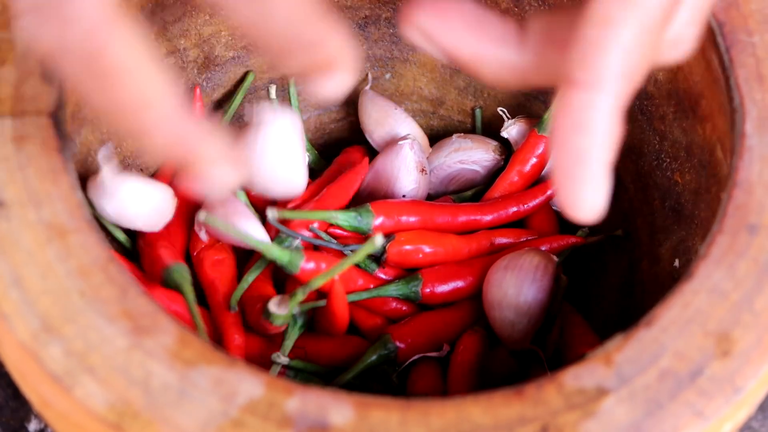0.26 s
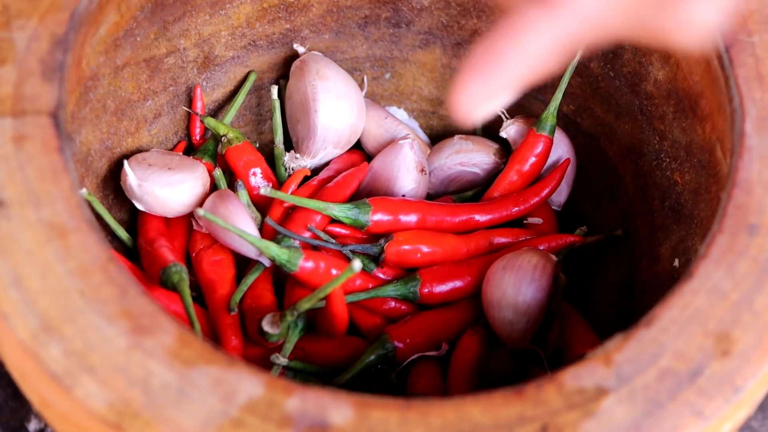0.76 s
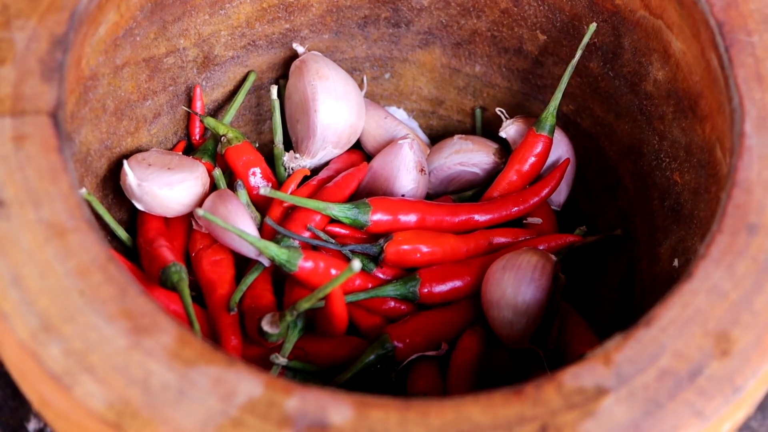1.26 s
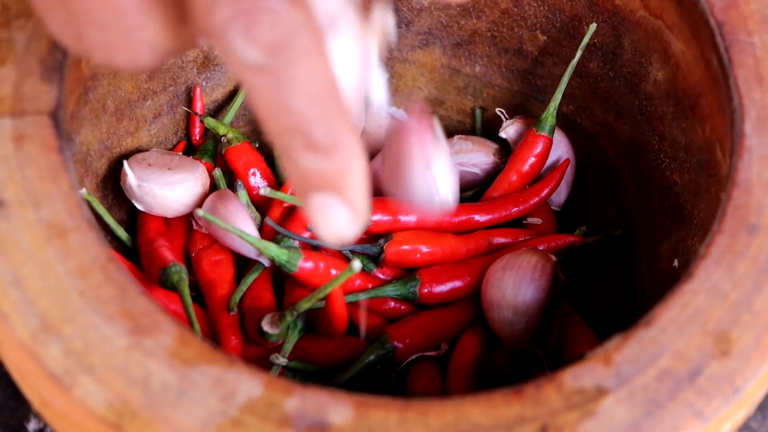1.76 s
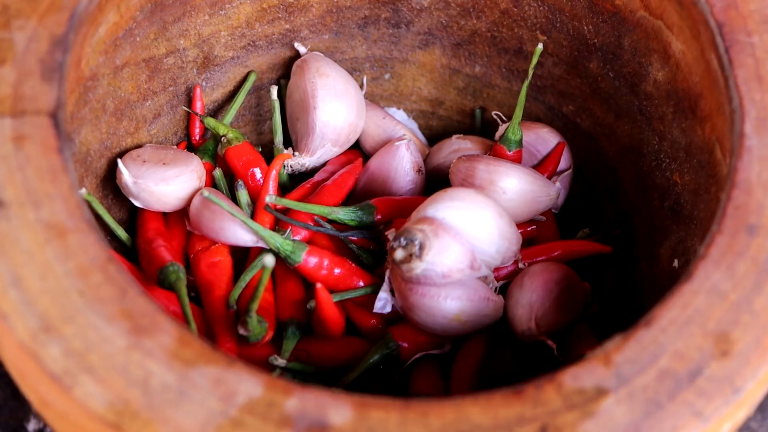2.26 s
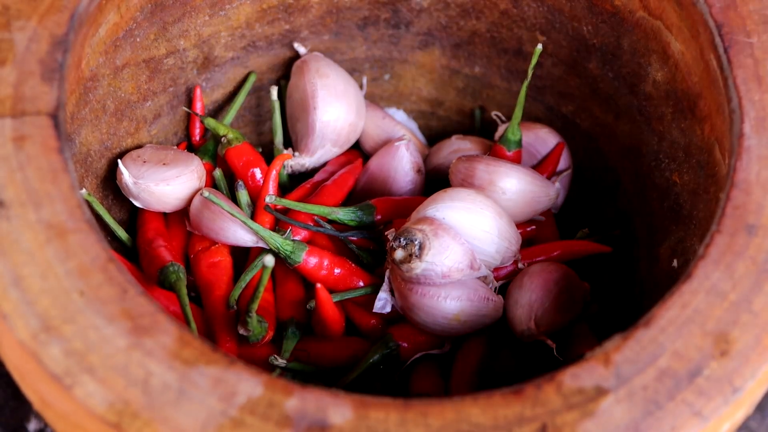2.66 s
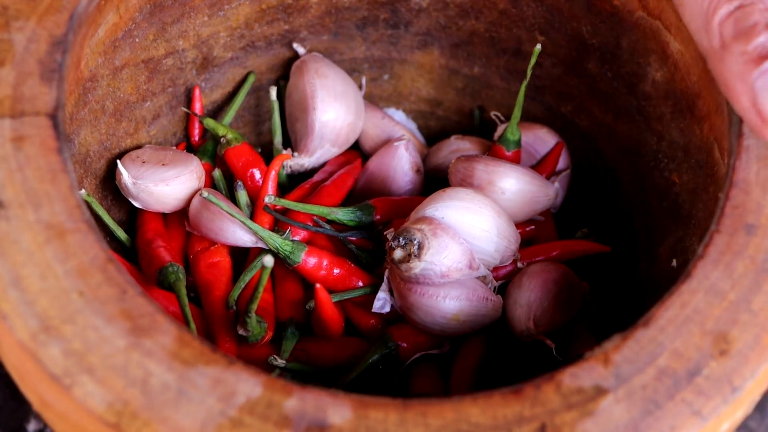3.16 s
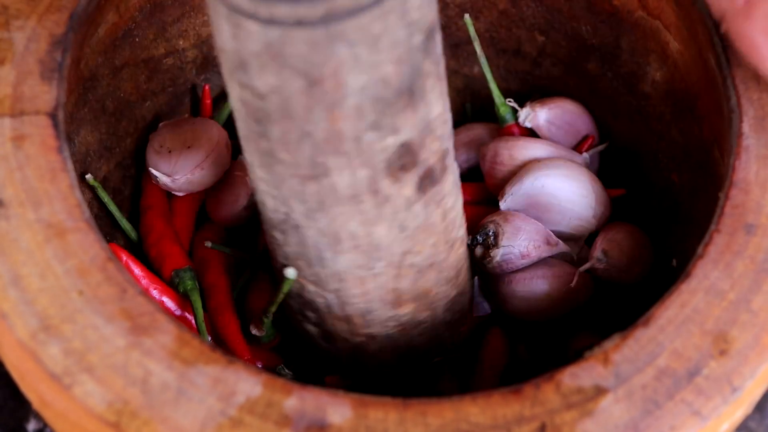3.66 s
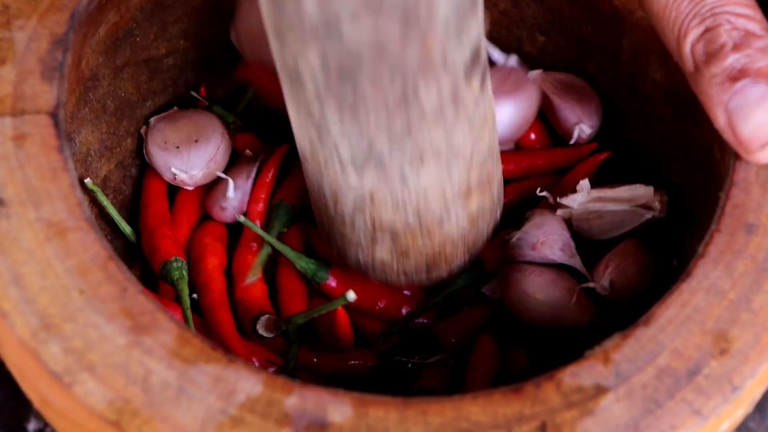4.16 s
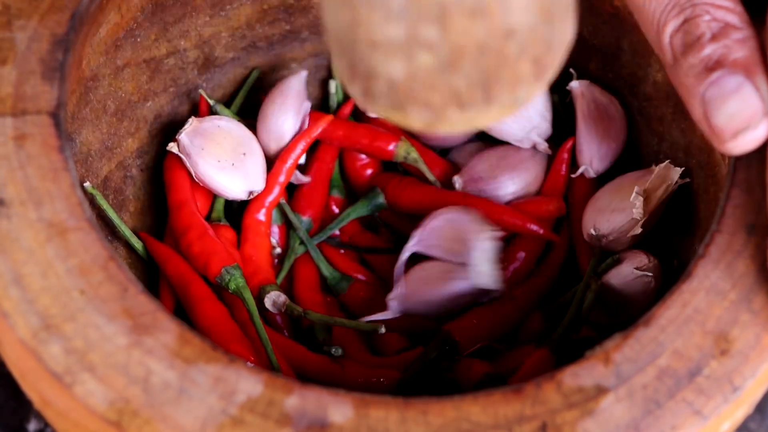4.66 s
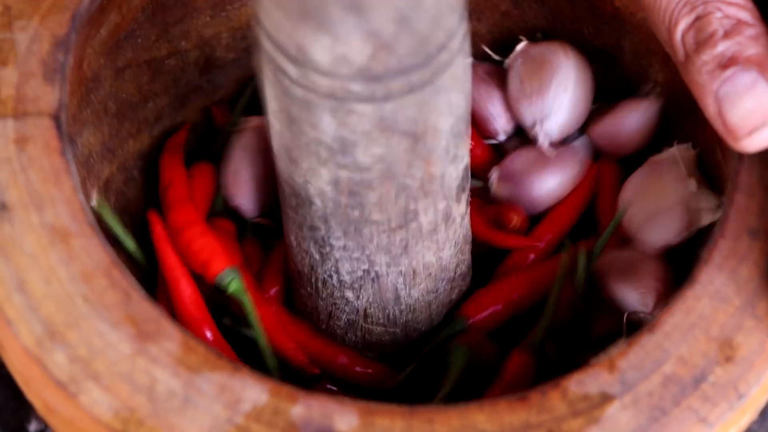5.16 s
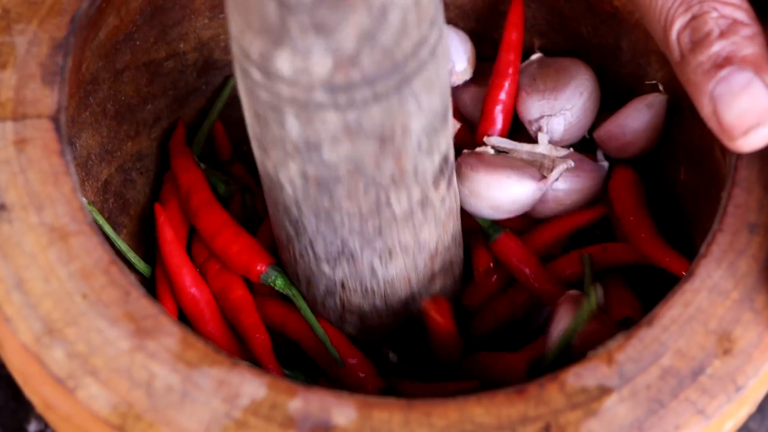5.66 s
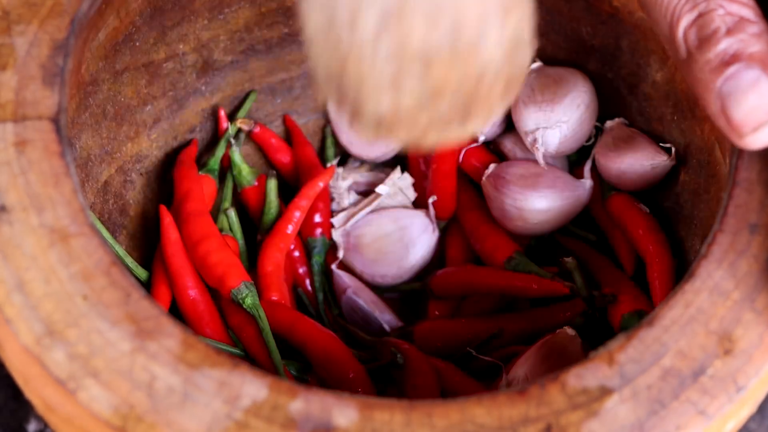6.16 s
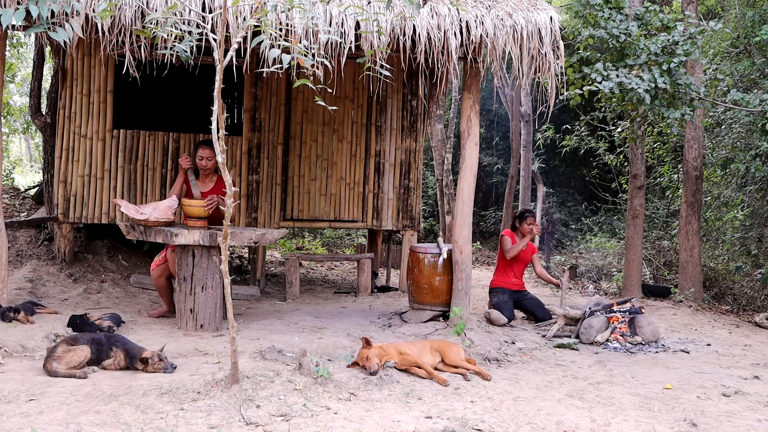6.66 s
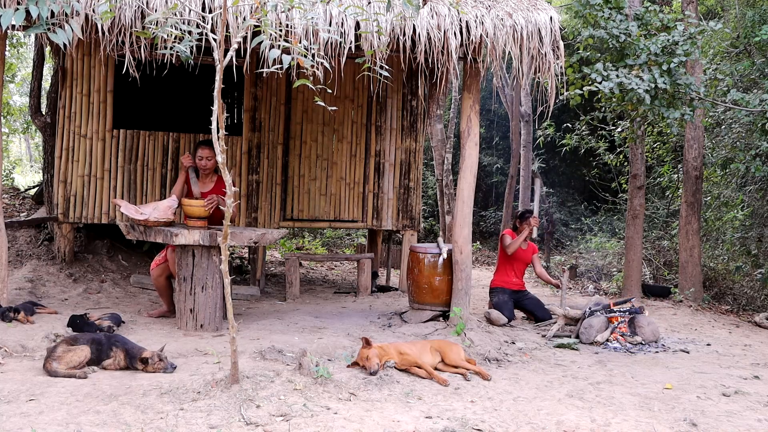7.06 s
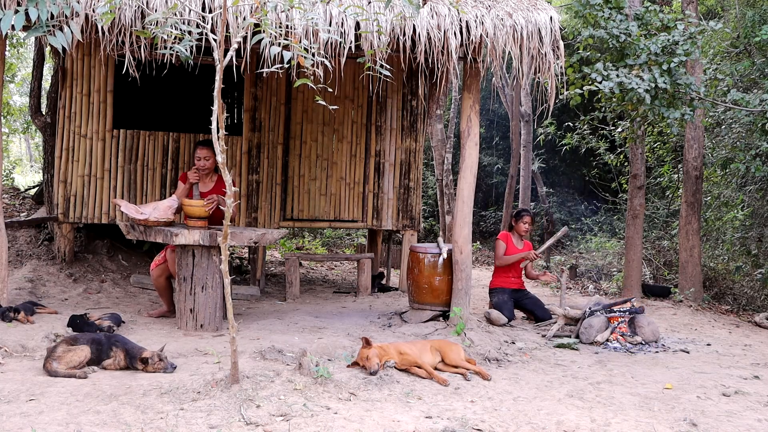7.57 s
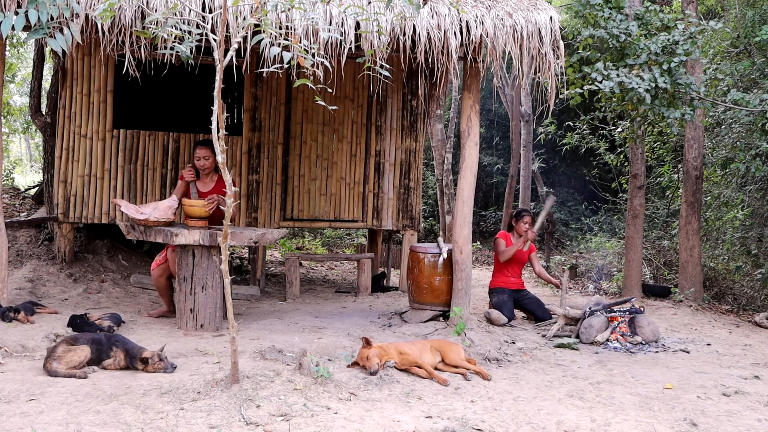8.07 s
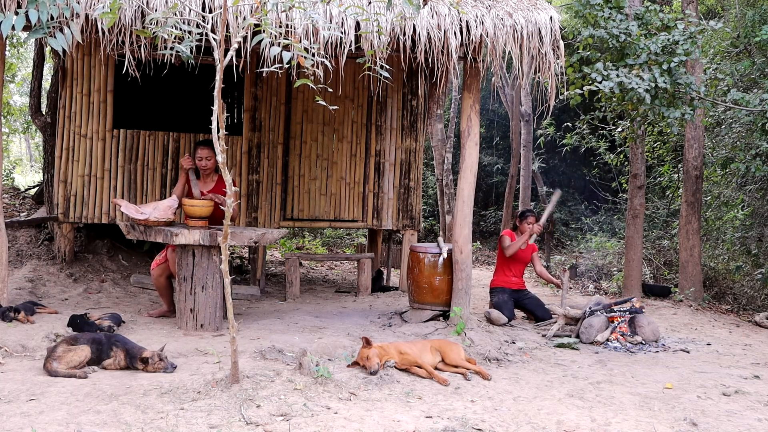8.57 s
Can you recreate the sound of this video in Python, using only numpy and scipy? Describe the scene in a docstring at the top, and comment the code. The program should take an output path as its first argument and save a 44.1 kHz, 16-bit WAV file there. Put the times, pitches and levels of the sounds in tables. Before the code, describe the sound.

Steady wooden mortar knocks with papery garlic skins scraped, then pods crushed under a pestle, before the pounding is heard from across a quiet yard

```python
"""Pounding chillies and garlic in a yard

Chillies and garlic are pounded in a wooden mortar in an open yard, with faint insects, birds and a low hum.
Near the microphone, ringing modes, noise and echoes make steady wooden knocks; shaped grains of noise make
a knife scraping garlic skins and a pestle starting to crush fresh pods.
After a brief silence the pounding is heard from across the yard, with light scuffs between the blows.
Bird notes and the insect trill are unsteady sines; the still air is steady coloured noise."""
import sys
import numpy as np
from scipy import signal
from scipy.fft import rfft, irfft, next_fast_len
from scipy.io import wavfile
from scipy.ndimage import uniform_filter1d

SR = 44100
rng = np.random.default_rng(int(sys.argv[2]) if len(sys.argv) > 2 else 0)


def generate_wav(sig):
    """Save sig (samples, or channels by samples) to the path in sys.argv[1] as 16-bit PCM at SR."""
    pcm = np.round(np.clip(np.atleast_2d(sig).T, -1, 1) * 32767).astype(np.int16)
    wavfile.write(sys.argv[1], SR, pcm)


N = 388080
TIME = np.arange(N) / SR
AGE = TIME[:SR // 2]  # time since a sound began [s]


# blows close to the microphone:
# (time [s], blow level [dB], low thud [dB], upper clack [dB], crack level [dB])
CLOSE_KNOCKS = [(.0835, 1, -1.5, 3.5, -22.5), (.5583, 1.5, -0.5, 1.5, -25.5), (1.0288, 5, -4.5, 0, -14),
                (1.5023, -13, 13, 6.5, -20.5), (1.9862, 3, -0.5, -10, -19), (2.4712, -9.5, 11, -6.5, -22),
                (2.9287, 4, -0.5, -4.5, -22), (3.4198, -0.5, 3, 5, -16), (3.9183, 2.5, -1, -2.5, -17.5),
                (4.4256, 1, 2.5, 3, -19), (4.9119, 2.5, 1.5, 0, -25), (5.8175, -10, 11, 1, -22.5)]
# ringing modes of the wood, close by: (frequency [Hz], level [dB], t60 [s])
CLOSE_WOOD = [(132, -19, 0.047), (168.7, -12.5, 0.055), (223, -19.5, 0.091), (330.4, -11, 0.021),
              (463.6, -26, 0.11), (625, -23.5, 0.12), (691, -18.5, 0.12), (808, -7.5, .021),
              (990, -23.5, 0.068), (1116, -29, 0.044), (1526, -14.5, 0.055), (1716, -4, 0.014),
              (1743, -18.5, 0.053), (2003, -23, 0.054), (2200, -24, 0.024), (2400, -18, 0.054),
              (2690, -19.5, 0.074), (2830, -30.5, 0.15)]
# first echoes from the ground and the hut, close by: (delay [s], level [dB])
CLOSE_ECHOES = [(.0057, -23), (0.0148, -17.5), (0.0262, -20)]
# left minus right, close by: (frequency [Hz], level difference [dB])
CLOSE_BALANCE = [(100, -1), (350, 2.5), (700, 1.5), (1100, 1), (1700, -8), (3000, -3), (8000, -1)]
# noisy crack of the contact, close by: (frequency [Hz], density [dB per Hz])
CLOSE_CRACK = [(100, -12), (500, 11.5), (1200, 7.5), (1800, 10), (2800, -2), (4500, -2), (7000, -12.5),
               (11000, -1.5), (16000, -28.5)]
# crowd of weak modes and echoes after a close blow: (frequency [Hz], density [dB per Hz])
CLOSE_AFTER = [(90, -19), (170, 1.5), (400, -5.5), (540, -12.5), (720, 8.5), (900, -8), (1220, -13),
               (1600, -1.5), (2000, -8), (2700, -10.5), (3500, -21.5), (8000, -30.5), (16000, -49.5)]


def close_knocks():
    """Blows on the wooden mortar near the microphone: short cracks over ringing wood."""
    return knocks(CLOSE_KNOCKS, CLOSE_WOOD, CLOSE_ECHOES, CLOSE_BALANCE, CLOSE_CRACK, CLOSE_AFTER,
                  crack_t60=0.087, after_db=-15.5, after_t60=0.059, tail_db=-30.0, tail_t60=0.32,
                  left_lag_ms=0.14)


# blows heard across the yard:
# (time [s], blow level [dB], low thud [dB], upper clack [dB], crack level [dB])
FAR_KNOCKS = [(6.4167, -4, 2, 9, -20.5), (6.8992, -5, 3, 8.5, -20), (7.3785, -1, -1.5, 13, -14.5),
              (7.8875, -28.5, 7, 9.5, -44), (8.4597, -3, -3.5, 12, -17)]
# ringing modes of the wood, across the yard: (frequency [Hz], level [dB], t60 [s])
FAR_WOOD = [(136, -15.5, 0.035), (239.3, -22.5, 0.1), (476.5, -20, 0.064), (612.4, -10.5, 0.14),
            (710, -16, 0.16), (850, -19, 0.032), (928, -12, 0.033), (1057, -29, 0.066), (1460, -34, 0.026),
            (1860, -12, 0.017), (1880, -13.5, 0.015), (2546, -28.5, 0.041), (2694, -36.5, 0.04),
            (2904, -33, 0.043), (3880, -49, 0.15)]
# first echoes from the ground and the hut, far off: (delay [s], level [dB])
FAR_ECHOES = [(.0062, -11.5), (.017, -26.5), (.032, -19.5)]
# left minus right, across the yard: (frequency [Hz], level difference [dB])
FAR_BALANCE = [(100, 2.5), (380, 0), (650, 3), (1100, 1), (2400, -7.5), (4400, 0.5), (8000, -10.5)]
# noisy crack of the contact, across the yard: (frequency [Hz], density [dB per Hz])
FAR_CRACK = [(100, -15.5), (400, 5), (1000, 8), (1400, -3.5), (2400, -5.5), (4200, -3.5), (7000, -28.5),
             (11000, -4), (16000, -38)]
# crowd of weak modes and echoes after a far blow: (frequency [Hz], density [dB per Hz])
FAR_AFTER = [(90, -2.5), (220, 1.5), (330, -5.5), (520, -4), (640, 19), (780, 1), (1020, 5.5), (1400, -8.5),
             (1800, -12.5), (2600, -14), (4200, -16.5), (10000, -26), (16000, -39.5)]


def far_knocks():
    """Blows heard across the yard: the blur of weak modes and echoes lingers longer."""
    return knocks(FAR_KNOCKS, FAR_WOOD, FAR_ECHOES, FAR_BALANCE, FAR_CRACK, FAR_AFTER,
                  crack_t60=0.099, after_db=-21.0, after_t60=0.16, tail_db=-35, tail_t60=0.57,
                  left_lag_ms=0.061)


def knocks(blows, modes, echoes, balance, crack, after, crack_t60, after_db, after_t60,
           tail_db, tail_t60, left_lag_ms):
    """A crack, the ringing wood and its echoes; food under the pestle shifts weight between thud and clack."""
    out = np.zeros((2, N))
    for time_s, blow_db, thud_db, clack_db, crack_db in blows:
        contact = [(330, blow_db + thud_db), (650, blow_db), (950, blow_db), (1600, blow_db + clack_db)]
        wood = strike(modes, contact, balance, left_lag_ms)
        add(out, time_s, wood)
        for delay_s, echo_db in echoes:
            add(out, time_s + delay_s, from_db(echo_db) * wood)

        crack_noise = noise(crack, len(AGE), alike=0.064, grain_db=-3.5)
        snap = from_db(crack_db) * decay(crack_t60) * crack_noise
        add(out, time_s, snap * pan(at_hz(balance, 5000)))

        # countless weak modes blur into noise that dies fast, then lingers in the yard
        blur_spectrum = [(hz, db + at_hz(contact, hz)) for hz, db in after]
        blur = noise(blur_spectrum, len(AGE), alike=0.25)
        fade = from_db(after_db) * decay(after_t60) + from_db(tail_db) * decay(tail_t60)
        strength = np.mean(from_db([db for hz, db in contact]))
        add(out, time_s, strength * fade * blur * pan(at_hz(balance, 1500)))
    return out


def strike(modes, contact, balance, left_lag_ms):
    """The main modes of the wood, weighted by the spectrum of the contact; the left side starts later."""
    out = 0
    lag = np.array([[left_lag_ms / 1000], [0]])
    for k, (hz, db, t60) in enumerate(modes):
        level_db = db + at_hz(contact, hz) + 0.91 * rng.normal()
        # upper modes shift with the spot that is struck
        spot = 1 + 0.016 * rng.normal() * min(hz / 2500, 1)
        mode = from_db(level_db) * pan(at_hz(balance, hz)) * ring(hz * spot, t60, lag)
        out = out + (-1) ** k * mode
    return cut(out, 140, "high", order=3)


# pods give way under the pestle: (first touch [s], burst [s], touch level [dB], peak level [dB],
# t60 [s], snap level [dB], snap frequency [Hz], thump level [dB])
CRUNCHES = [(3.428, 3.453, -23, -23, 0.053, -37, 1705, -25),
            (4.107, 4.124, -25, -8, 0.052, -19.5, 2300, -25),
            (4.486, 4.503, -35, -10.5, 0.088, -13.5, 2425, -31),
            (4.863, 4.881, -26.5, -15, 0.11, 3.5, 2470, -25), (5.25, 5.263, -29, -7, 0.051, -27, 1403, -26),
            (5.629, 5.647, -46, -12, 0.074, -1.5, 2350, -18),
            (6.024, 6.0402, -23.5, -7.5, 0.051, -1, 1926, -40)]
# crackle of the crushed skins: (frequency [Hz], density [dB per Hz])
CRUNCH = [(47, -51.5), (80, -10.5), (250, -18), (702, -2), (1140, -6.5), (1600, 0.5), (3240, -7.5),
          (4230, -3.5), (5400, -7.5), (6740, -8), (8050, -10), (9610, -8), (11000, -10.5), (12300, -13.5),
          (16000, -40)]


def crunches():
    """Skins crackle from the first touch as the load builds, the pod bursts, and the pestle lands on the pulp."""
    out = np.zeros((2, N))
    for touch_s, burst_s, touch_db, peak_db, t60, snap_db, snap_hz, thump_db in CRUNCHES:
        load_size = max(int((burst_s - touch_s) * SR), 2)
        load = from_db(np.linspace(touch_db, peak_db, load_size))
        shape = np.concatenate([load, from_db(peak_db) * decay(t60)])
        crackling = noise(CRUNCH, len(shape), alike=0.22, grain_db=4.5, grains_per_s=1500)
        add(out, touch_s, shape * crackling)

        burst = noise(hump(snap_hz, below_db=5.0, above_db=9.5), len(AGE), alike=0.3) * decay(0.023)
        thump = from_db(-9) * ring(92, 0.1) + ring(560, 0.04)
        add(out, burst_s, from_db(snap_db) * burst + from_db(thump_db) * thump)
    return out * pan(-1.4)


# pieces slide back as the pestle lifts: (middle time [s], level [dB], length [s])
SLIDES = [(3.793, -49.5, 0.14), (4.291, -41.5, 0.11), (4.667, -45.5, 0.18), (5.03, -54.5, 0.039),
          (5.41, -48.5, .1), (5.92, -54.5, 0.28), (6.157, -49, 0.019)]


def pulp():
    """Crushed skins crackle as they settle after each burst, and as they slide back under the lifted pestle."""
    level = np.zeros((1, N))
    for touch_s, burst_s, *rest in CRUNCHES:
        add(level, burst_s, from_db(-44) * decay(t60=0.7))
    for middle_s, db, length_s in SLIDES:
        level = level + from_db(db) * np.exp(-2 * ((TIME - middle_s) / length_s) ** 2)
    crackling = level * crackle(grain_db=2, clump_db=1)
    return cut(crackling, 13000, "low", order=4) * pan(-0.95)


# the knife snaps through dry skin: (time [s], level [dB], frequency [Hz])
NICKS = [(.341, -38, 3000), (0.35, -23, 2410), (.52, -29, 2760), (0.83, -37, 4620), (1.018, -36, 9000),
         (1.199, -29.5, 6140), (1.2222, -13, 4130), (1.288, -33.5, 6840), (1.301, -36, 6940),
         (1.389, -18, 6500), (1.3997, -16, 6950), (1.412, -26, 9050), (1.663, -33, 9200),
         (1.885, -23, 1810), (2.256, -27.5, 3260)]
# the blade drags along a clove and peels a strip:
# (time of the peak [s], level [dB], frequency [Hz], build-up [s], t60 [s])
SCRAPES = [(.035, -33.5, 4470, .11, 0.1), (.2, -44, 7750, .2, 0.5), (.5, -52.5, 8000, .2, .15),
           (.893, -32, 7560, .12, 0.23), (0.975, -39.5, 10700, .6, 0.47), (1.15, -46, 6000, .15, 0.45),
           (1.379, -28, 8050, .058, 0.041), (1.62, -36.5, 8400, .12, .06), (1.792, -39, 8700, .05, 0.085),
           (1.944, -38.5, 3840, .05, 0.098), (2.047, -34, 8200, .13, 0.037), (2.159, -50, 5000, .2, 0.22)]
NICK_BUILD_UP_S, NICK_T60_S = 0.0045, 0.023
PEELING_END_S, FINGERS_DB = 2.3, -59  # fingers rustle the skins until the peeling stops


def peeling():
    """The knife nicks and scrapes papery skins over the soft rustle of the fingers."""
    out = from_db(FINGERS_DB) * (TIME < PEELING_END_S) * crackle(grain_db=4, clump_db=4.5)
    nicks = [(time_s, db, hz, NICK_BUILD_UP_S, NICK_T60_S) for time_s, db, hz in NICKS]
    for time_s, db, hz, build_up, t60 in nicks + SCRAPES:
        spectrum = hump(hz, below_db=6, above_db=7)
        scrape = swell(spectrum, build_up, t60, alike=0.12, grain_db=4.0)
        add(out, time_s - 0.5, from_db(db) * scrape)
    return cut(out, 13000, "low", order=4) * pan(-0.84)


# rustle of dry skins: (frequency [Hz], density [dB per Hz])
SKIN = [(290, -52.5), (500, -19), (1080, -17), (1670, 1.5), (1840, -7.5), (2730, -3), (7100, -8),
        (9920, -8), (11500, -8), (16000, -25)]
FRACTURES_PER_S, FRACTURE_DB = 42, -4.5  # tiny separate fractures, and their level before the skin colour


def crackle(grain_db, clump_db):
    """A grainy rustle of skins that comes in clumps, with separate tiny fractures of uneven size on top."""
    sizes = from_db(5 * np.minimum(rng.exponential(1, N), 3))
    starts = sizes * (rng.random(N) < FRACTURES_PER_S / SR)
    # each fracture dies away exponentially with a time constant of 1.3 ms
    fractures = signal.lfilter([1], [1, -np.exp(-1 / (0.0013 * SR))], starts + 1e-18)
    rustle = 0.69 * from_db(clump_db * flicker(N, 60))
    skin = noise(SKIN, N, alike=0.13, grain_db=grain_db, grains_per_s=550)
    return skin * (rustle + from_db(FRACTURE_DB) * rms_one(fractures))


# small bumps and dropping pieces: (time [s], level [dB], frequency [Hz])
BUMPS = [(2.08, -34.5, 467), (2.132, -32, 263), (2.145, -26, 310), (2.158, -24.5, 222), (2.181, -36, 256),
         (4.168, -29, 537), (4.201, -32.5, 490), (4.212, -33, 584), (4.245, -31, 520), (4.546, -31.5, 504),
         (4.614, -30.5, 630), (4.626, -30, 660), (5.315, -29.5, 550), (7.8866, -32, 1665),
         (8.123, -35, 1080), (8.289, -42, 1240)]


def bumps():
    """Soft contacts: a short hollow note with a little noise around it; the lower it is, the longer it rings."""
    out = np.zeros((2, N))
    for time_s, db, hz in BUMPS:
        t60 = 32 / hz  # about 32 cycles of ringing
        rub = noise(hump(hz, below_db=13, above_db=16), len(AGE), alike=0.9) * decay(t60)
        add(out, time_s, from_db(db) * (0.53 * ring(hz, t60) + 0.5 * rub))
    return out


# light scuffs on the wood across the yard:
# (time of the peak [s], level [dB], build-up [s], t60 [s])
SCUFFS = [(6.485, -29.5, 0.03, 0.13), (6.887, -35, 0.042, 0.063), (7.287, -37.5, 0.032, 0.12),
          (7.666, -39.5, 0.041, 0.12), (8.045, -34.5, 0.046, 0.11), (8.402, -41, 0.052, 0.12),
          (8.779, -30.5, 0.025, 0.089)]
# colour of the scuffs: (frequency [Hz], density [dB per Hz])
SCUFF = [(59, -33.5), (100, -5.5), (373, -6.5), (648, -1.5), (1130, -16), (1480, -8.5), (2270, -7.5),
         (2580, -14), (3540, -10.5), (4670, -14), (10900, -25.5), (14400, -31.5), (16000, -50.5)]


def scuffs():
    """Wood slides on wood between the far blows: grainy noise swells and dies away."""
    out = np.zeros((2, N))
    for time_s, db, build_up, t60 in SCUFFS:
        scuff = swell(SCUFF, build_up, t60, alike=0.5, grain_db=3.0)
        add(out, time_s - 0.5, from_db(db) * scuff)
    return out


# a small bird calls in quick runs: (time of last note [s], notes [count], level of last note [dB])
BIRD_RUNS = [(2.3, 1, -62), (2.52, 1, -56), (2.778, 3, -58), (3.035, 1, -57), (3.255, 3, -55),
             (3.71, 3, -55.5), (3.895, 1, -55), (4.07, 1, -57.5), (4.4, 2, -50.5), (4.84, 1, -60),
             (5.22, 3, -54), (5.441, 1, -52), (5.61, 2, -61)]
# one falling note of a run: (time [s], pitch [Hz])
NOTE = [(0, 4650), (.026, 4015)]
NOTE_GAP_S, NOTE_GROWS_DB = 0.042, 3.5  # each note of a run is louder than the one before
# a second bird whistles: (time [s], level [dB])
WHISTLES = [(6.295, -53.5), (6.8, -61), (7.8, -56.5)]
# its high, dipping note: (time [s], pitch [Hz])
WHISTLE = [(0, 5140), (.012, 7300), (.035, 7120), (.06, 6300), (.1, 7500)]


def birds():
    """Runs of falling chirps and a few high whistles from the trees: thin gliding sines."""
    out = np.zeros((2, N))
    for last_s, notes, db in BIRD_RUNS:
        for k in range(round(notes)):  # counted back from the last note
            start_s = last_s - k * NOTE_GAP_S - NOTE[-1][0] / 2
            add(out, start_s, from_db(db - k * NOTE_GROWS_DB) * glide(NOTE, waver=0.012))
    for time_s, db in WHISTLES:
        add(out, time_s, from_db(db) * glide(WHISTLE, waver=0.046))
    return out


def glide(shape, waver):
    """A thin, unsteady note that follows a pitch shape."""
    time_s, hz = np.transpose(shape)
    size = int(time_s[-1] * SR)
    pitch = np.interp(AGE[:size], time_s, hz) * (1 + waver * flicker(size, 900))
    return np.sqrt(np.hanning(size)) * np.sin(2 * np.pi * np.cumsum(pitch) / SR)


def insects(hz, db):
    """A rough trill that wavers in pitch, flutters in strength and comes in waves."""
    pitch = hz * (1 + 0.014 * flicker(N, 14) + 0.028 * flicker(N, 1500))
    flutter_db = 4 * flicker(N, 45) + 3.5 * flicker(N, 8)
    return from_db(db + flutter_db) * np.sin(2 * np.pi * np.cumsum(pitch) / SR)


# a low hum, perhaps a far engine that speeds up: (time [s], mean shaft rate [Hz], middle level [dB])
ENGINE = [(0, 27, -69.5), (1.8, 28.02, -63.5), (2.5, 26.49, -65), (3.1, 31.2, -63), (3.9, 35.26, -57.5),
          (4.8, 35.05, -60), (5.7, 41.1, -56), (6.2, 42.4, -61.5)]


def engine():
    """A low hum at the second and third orders of a shaft, unsteady in speed and level."""
    time_s, shaft_hz, level_db = np.transpose(ENGINE)
    hz = np.interp(TIME, time_s, shaft_hz)
    db = np.interp(TIME, time_s, level_db)
    turn = 2 * np.pi * np.cumsum(hz * (1 + 0.02 * flicker(N, 14))) / SR
    orders = np.sin(2 * turn) + 1.2 * np.sin(3 * turn)
    return from_db(db + 2.5 * flicker(N, 2.9)) * orders


# still air of the yard around the close microphone: (frequency [Hz], density [dB per Hz])
CLOSE_AIR = [(15, -39.5), (25, -17.5), (55, 0.5), (94, -2), (175, -7), (451, -12), (516, -14.5),
             (695, -10.5), (988, -15.5), (1520, -16.5), (3720, -22.5), (4250, -20.5), (6740, -26.5),
             (10500, -26), (13200, -32.5), (16000, -47)]


def close_air():
    """Still air close to the mortar: steady noise, nearly alike on both sides."""
    return from_db(-57) * noise(CLOSE_AIR, N, alike=0.86)


# still air heard from across the yard: (frequency [Hz], density [dB per Hz])
FAR_AIR = [(15, -28), (25, -1), (66, -1), (363, -17.5), (624, -12.5), (754, -20.5), (1070, -15.5),
           (1160, -24), (1290, -19.5), (3160, -24.5), (4030, -23.5), (4370, -24.5), (6920, -26.5),
           (10700, -26.5), (16000, -59.5)]


def far_air():
    """Still air across the yard: steady noise, wider between the two sides."""
    return from_db(-56.5) * noise(FAR_AIR, N, alike=0.21)


def yard(x, db, t60):
    """A faint, dull tail scattered back by the hut and the trees."""
    scatter = cut(rng.standard_normal((2, len(AGE))), 7000, "low", order=1)
    tail = scatter * decay(t60) * (1 - decay(0.031))
    response = rms_one(tail) / np.sqrt(len(AGE))
    return x + from_db(db) * signal.fftconvolve(x, response, axes=1)[:, :N]


def ring(hz, t60, lag=0):
    """One struck mode: a dying sine that starts after a lag [s]."""
    age = np.maximum(AGE - lag, 0)
    return np.sin(2 * np.pi * hz * age) * decay(t60)


def swell(spectrum, build_up, t60, alike, grain_db):
    """Grains that build up to a peak after half a second, then die away."""
    shape = np.concatenate([decay(build_up)[::-1], decay(t60)])
    return shape * noise(spectrum, len(shape), alike, grain_db)


def noise(spectrum, size, alike, grain_db=0, grains_per_s=1000):
    """Coloured stereo noise of rms 1; grain_db sets how unevenly it clumps into tiny fractures."""
    grains = from_db(grain_db * np.minimum(flicker(size, grains_per_s), 2.5))
    mid, side = rng.standard_normal((2, size)) * grains
    side = cut(side, 160, "high", order=1)  # long waves reach both sides alike
    alike = np.clip(alike, 0, 1)
    both = np.sqrt(1 + alike) * mid + np.sqrt(1 - alike) * side * [[1], [-1]]
    padded = next_fast_len(size)
    colour = from_db(at_hz(spectrum, np.fft.rfftfreq(padded, 1 / SR)))
    return rms_one(irfft(rfft(both, padded) * colour, padded)[:, :size])


def hump(hz, below_db, above_db):
    """A spectrum that peaks at hz and falls by so many dB an octave on each side, for four octaves."""
    return [(hz / 2 ** 4, -4 * below_db), (hz, 0), (hz * 2 ** 4, -4 * above_db)]


def flicker(size, per_s):
    """Random values around 0, per_s new ones a second, joined by straight lines."""
    at = np.arange(size) * per_s / SR
    knots = rng.standard_normal(size // 16 + 2)
    return np.interp(at, np.arange(len(knots)), knots)


def decay(t60):
    """Falls by 60 dB in t60 [s]."""
    return np.exp(-np.log(1000) * AGE / t60)


def pan(db):
    """Left and right gains for a level difference."""
    return from_db(np.array([[0.5], [-0.5]]) * db)


def cut(x, hz, kind, order=2):
    """Low- or high-pass."""
    sos = signal.butter(order, min(hz, SR / 2 - 1), kind, fs=SR, output="sos")
    return signal.sosfilt(sos, x + 1e-18)


def at_hz(points, hz):
    """Read a table on a log-frequency axis."""
    table = np.array(points)
    return np.interp(np.log(np.maximum(hz, 1)), np.log(table[:, 0]), table[:, 1])


def from_db(db):
    """Amplitude for a level in dB."""
    return 10 ** (np.asarray(db) / 20)


def rms_one(x):
    """Scale to an rms of 1."""
    return x / np.sqrt(np.mean(x ** 2) + 1e-20)


def add(out, time_s, sound):
    """Mix a sound in at a given time."""
    start = round(time_s * SR)
    first, last = max(start, 0), min(start + sound.shape[-1], N)
    out[:, first:last] += sound[..., first - start:last - start]


# the brief silence between the close and the far view: (start [s], end [s])
SILENCE = (6.256, 6.308)


def scene():
    """The close view, a brief silence, then the view from across the yard."""
    close = close_knocks()
    close += yard(crunches() + pulp() + peeling() + bumps() + birds(), db=-26.5, t60=0.24)
    close += close_air() + engine() + insects(hz=8470, db=-68)

    far = far_knocks()
    far += yard(scuffs() + bumps() + birds(), db=-17.0, t60=0.3)
    far += far_air() + insects(hz=8630, db=-82.5)

    views = np.array([TIME < SILENCE[0], TIME > SILENCE[1]], float)
    close_on, far_on = uniform_filter1d(views, size=400, axis=1)  # short ramps, about 9 ms
    return close * close_on + far * far_on


def record(dry):
    """The hardest blows overload the recorder; the deepest bass and the top are cut."""
    clipped = cut(np.clip(dry, -1, 1), 38, "high")
    top_cut = signal.cheby2(14, 60, 16700, fs=SR, output="sos")  # 60 dB down from 16.7 kHz up
    return signal.sosfilt(top_cut, clipped)


dry = scene()
out = record(dry)
generate_wav(out)
```